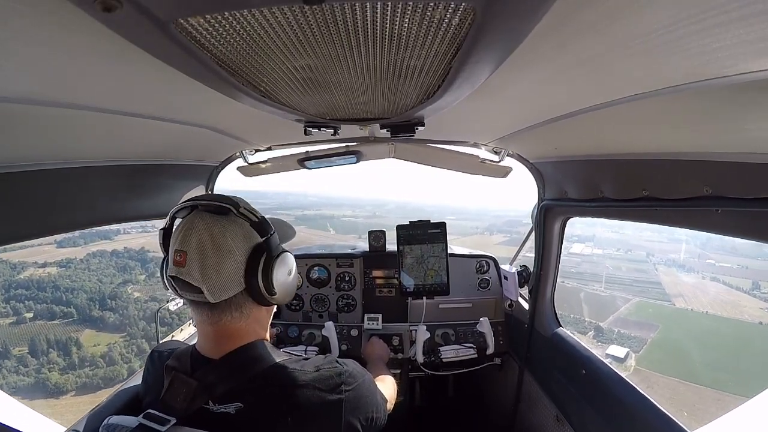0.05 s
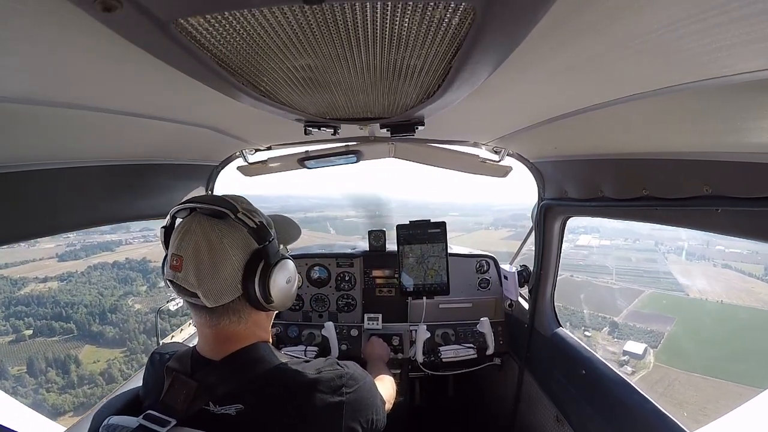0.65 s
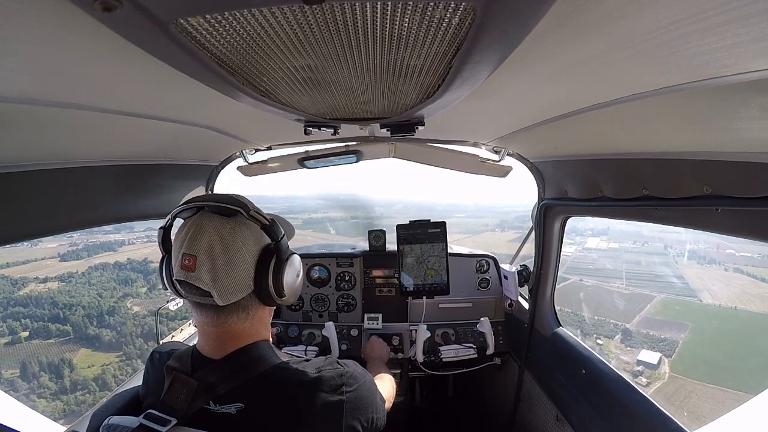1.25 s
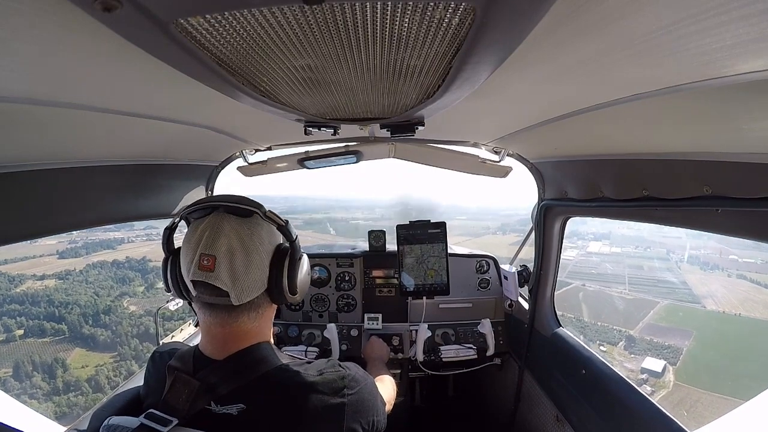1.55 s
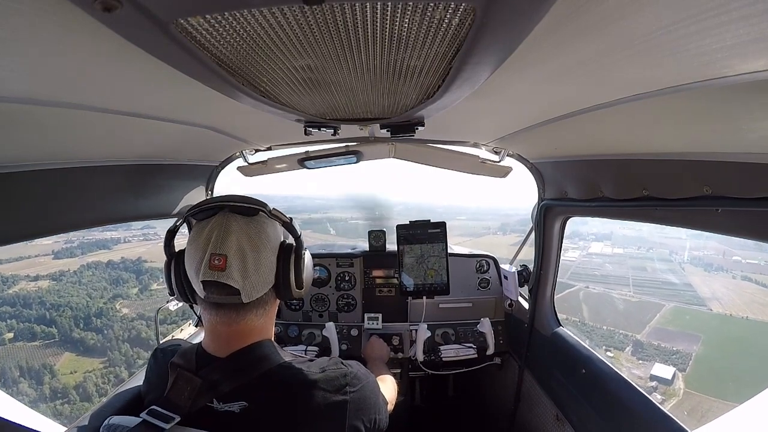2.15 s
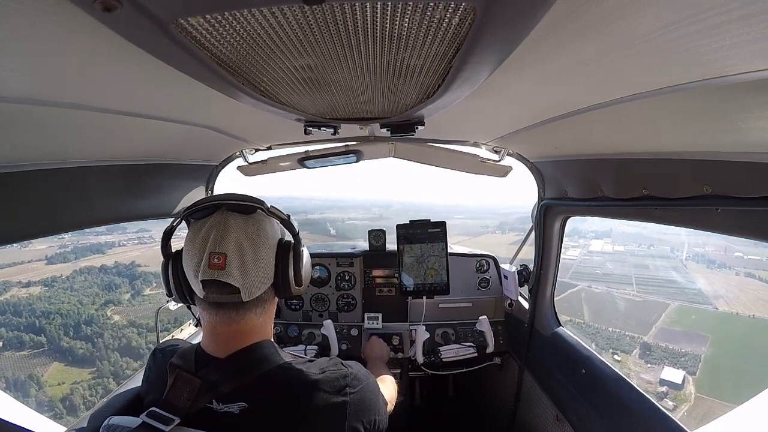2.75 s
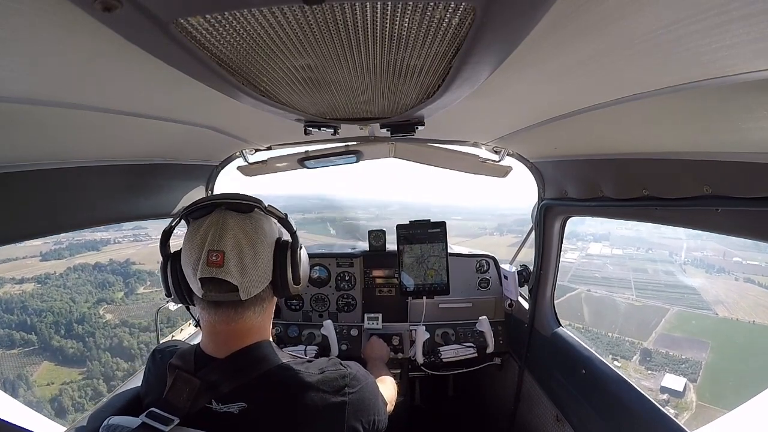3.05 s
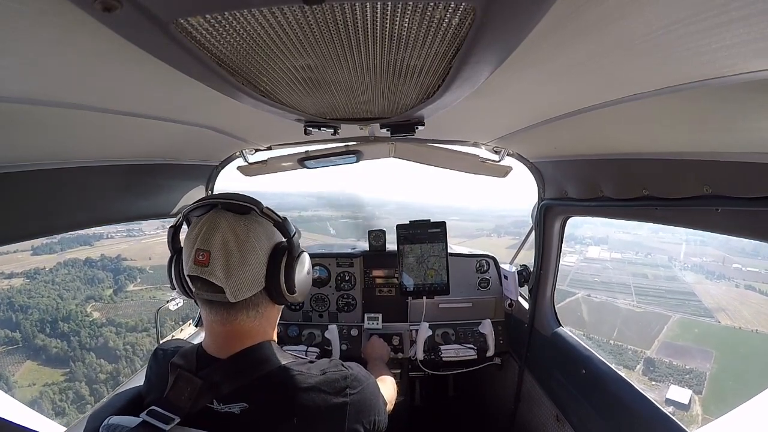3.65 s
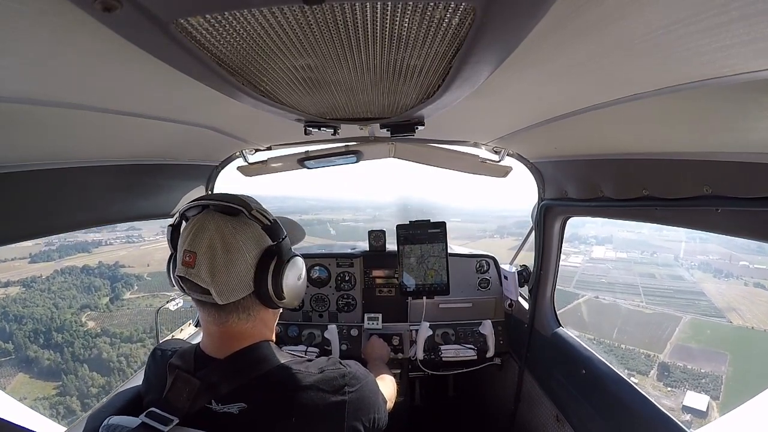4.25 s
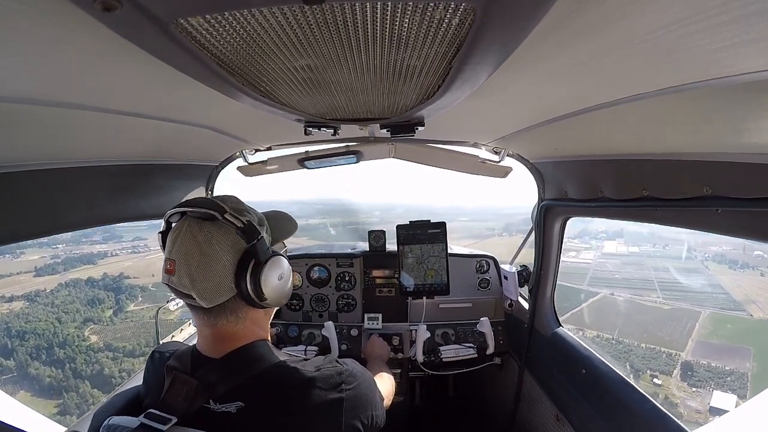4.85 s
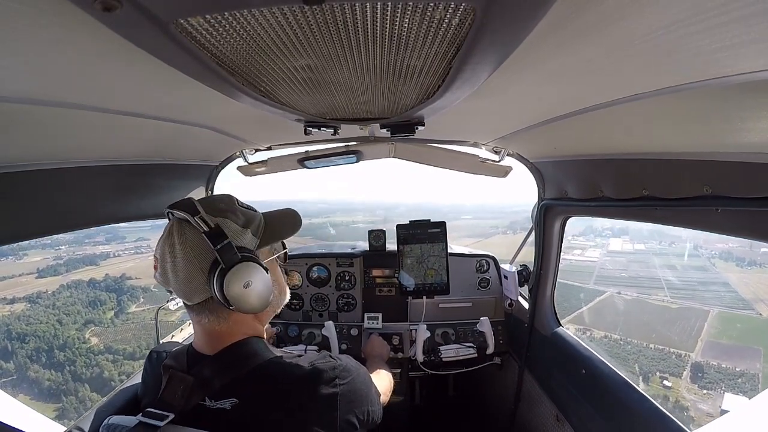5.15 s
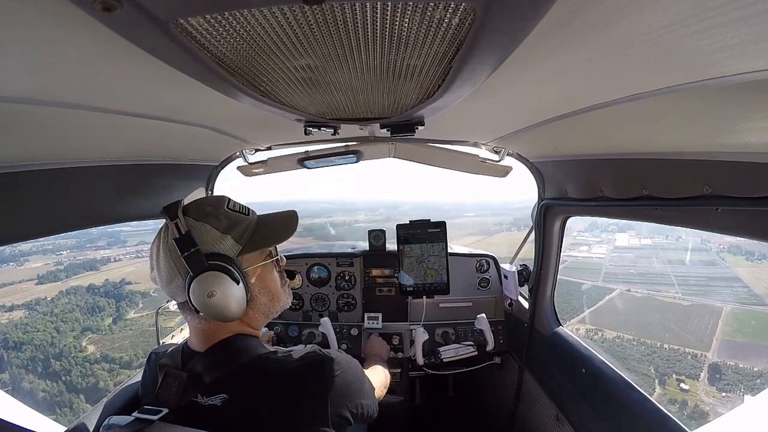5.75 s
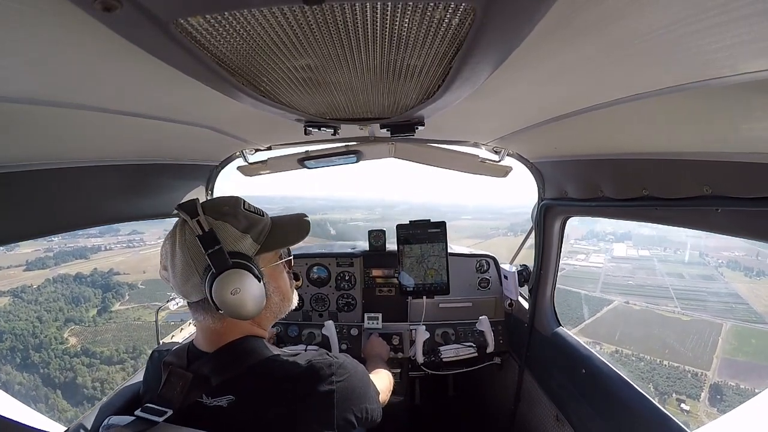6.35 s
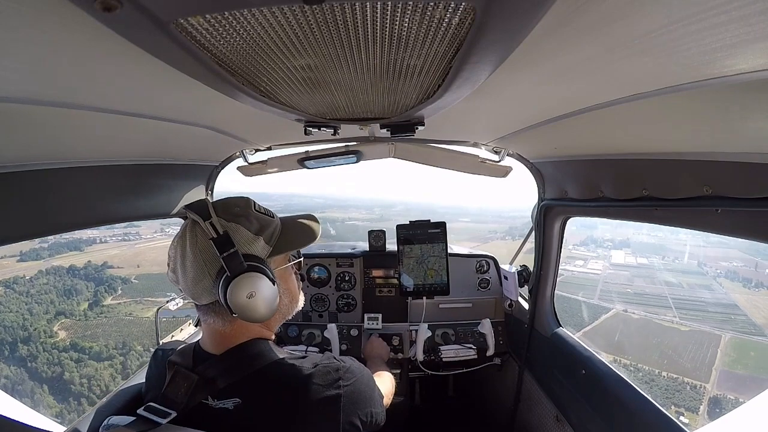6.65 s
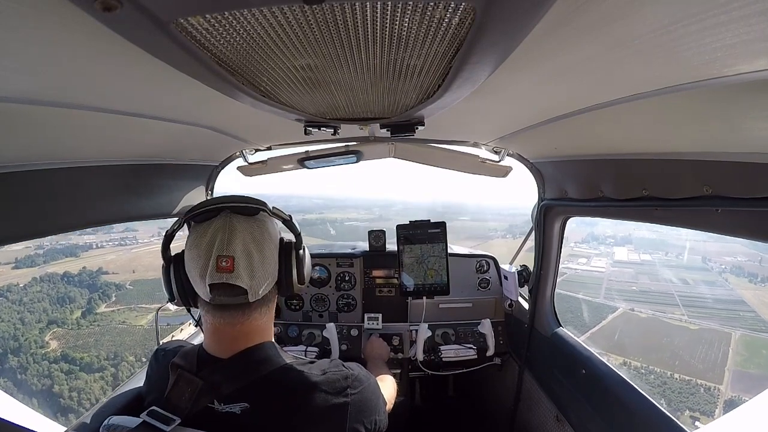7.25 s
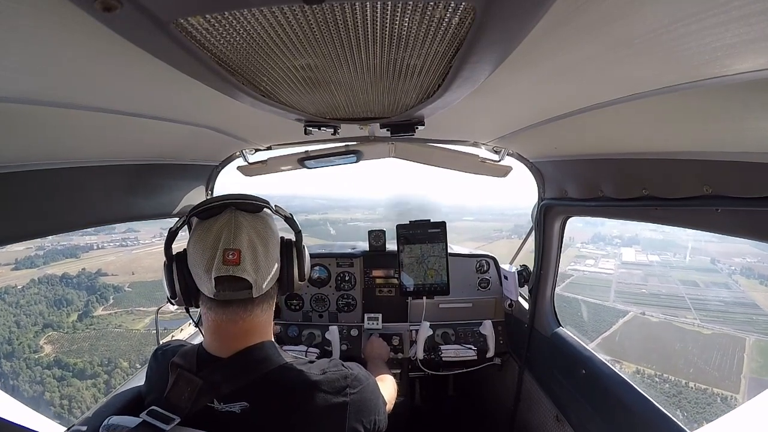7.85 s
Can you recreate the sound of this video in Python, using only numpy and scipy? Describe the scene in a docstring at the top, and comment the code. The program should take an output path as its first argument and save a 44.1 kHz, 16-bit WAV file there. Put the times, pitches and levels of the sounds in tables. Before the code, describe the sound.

Heard from inside a light aircraft's cabin, a low, booming engine and propeller hum runs throughout over hissing air. Rough air soon sets in with a few dull thuds: the hull rumbles, the panels drum, a leak whistles faintly and the engine sounds buzzier. A little past halfway the wind noise falls back, leaving a strong, steady boom at a slightly higher engine speed.

```python
"""A four-cylinder engine and its two-blade propeller, from one microphone inside a light aircraft in flight.
Blade passes and firings boom close around the seat, over a stack of shaft orders and a faint clatter.
Just outside, air buffets the hull, drums on the panels, hisses and whistles through leaks. Rough air
loads the blades and swells the rush from about 1 s to 5 s, then drops away; the propeller speeds up a
little."""
import sys
import numpy as np
from scipy import signal
from scipy.fft import rfft, irfft, next_fast_len
from scipy.io import wavfile
from scipy.ndimage import uniform_filter1d, minimum_filter1d

SR = 44100
rng = np.random.default_rng(int(sys.argv[2]) if len(sys.argv) > 2 else 0)


def int16_out(signal):
    """Quantize to a 16-bit WAV file."""
    q = np.round(np.clip(np.atleast_2d(signal).T, -1, 1) * 32767)
    wavfile.write(sys.argv[1], SR, q.astype(np.int16))


N = 353682

# propeller shaft: (time [s], speed [turns/s])
SHAFT_SPEED = [(0, 36.35), (.3, 36.23), (.75, 36.2), (1.5, 37.25), (2.5, 37.22), (3.25, 36.7), (4.5, 37.02),
               (4.75, 37.24), (5.15, 38.0), (5.5, 38.42), (6, 38.42), (6.4, 38.2), (7.25, 38.1),
               (8.02, 38.2)]
# cabin boom at the microphone: (time [s], deep tone level [dB], octave level [dB])
BOOM_LEVELS = [(0, -12, -23), (.3, -11, -22.5), (.9, -12.5, -29), (1.3, -18, -42), (1.65, -21, -31),
               (2.2, -21.5, -20), (2.7, -20, -18), (3.05, -30, -25.5), (3.4, -16, -33), (3.65, -10.5, -43),
               (4.15, -15, -23.5), (4.76, -24, -20), (5.05, -9.5, -20.5), (5.5, -10.5, -27), (5.9, -8, -29),
               (6.4, -11.5, -24.5), (8.02, -10.5, -24.5)]
# engine and propeller lines; half orders come from unequal cylinders:
# (order [x shaft speed], relative level unloaded [dB], relative level at full load [dB])
SHAFT_ORDERS = [(1, -34, -22), (1.5, -36, -28), (2.5, -33.5, -35), (3, -33, -22.5), (3.5, -38, -27.5),
                (4.5, -40, -28.5), (5, -45, -37), (5.5, -53, -39), (6, -40, -26), (7, -51, -35),
                (7.5, -57, -41), (9, -56, -41), (10, -46, -34), (12, -59, -47), (14, -46.5, -48),
                (15, -51, -45), (16, -56, -52), (16.5, -57, -51), (17, -59, -50), (18, -59, -46),
                (18.5, -52, -52), (20.5, -65, -48), (26.5, -57, -49), (31, -61, -53), (40, -63, -49)]
# engine clatter: (frequency at the opening shaft speed [Hz], half-order level re the air rush [dB])
CLATTER_SPECTRUM = [(400, -31.5), (520, -33), (750, -29.5), (1100, -30), (1500, -34.5), (2000, -38.5)]
# air rush along the hull: (time [s], relative level [dB])
AIR_RUSH = [(0.03, -30), (0.14, -27.5), (0.6, -31.5), (1.11, -31.5), (1.55, -27), (2.1, -25), (3.2, -24),
            (3.9, -25.5), (4.6, -24.5), (5.08, -24), (5.27, -31), (6.08, -36), (6.8, -35.5), (7.55, -33.5),
            (7.93, -35)]
# buffeting of the hull: (frequency [Hz], relative density [dB])
BUFFET_SPECTRUM = [(8, -21), (18, -12.5), (30, -6.5), (55, -3), (85, 0), (115, -4.5), (150, -10.5),
                   (200, -18.5), (400, -41)]
# drumming of the cabin panels: (frequency [Hz], relative density [dB])
PANEL_SPECTRUM = [(60, -29), (120, -13), (165, -10), (220, -2), (275, 0.5), (325, 0), (390, -2.5),
                  (440, -9.5), (500, -32.5), (900, -49)]
# harder drumming on a first gust and as the rush drops: (peak time [s], half length [s], lift [dB])
PANEL_SWELLS = [(0.197, 0.41, 2.7), (5.25, .25, 2)]
# air hiss as heard from inside: (frequency [Hz], relative density [dB])
HISS_SPECTRUM = [(150, 2), (480, -3), (600, -1.5), (850, -3), (1250, -5.5), (1650, -4.5), (2350, -8),
                 (3100, -15.5), (3700, -16.5), (4400, -11.5), (5600, -14), (6700, -27), (8900, -35.5),
                 (10200, -44.5), (11500, -58)]
# hollow ring of the cabin and its leaks: (centre [Hz], width [Hz], lift [dB])
CABIN_RESONANCES = [(558, 29, 3), (737, 26, 1.5), (877, 55, 3.5), (1540, 61, 1.5), (1668, 52, 2),
                    (1806, 82, 5.5), (1854, 90, -4), (2100, 70, 1.5), (3920, 110, 2)]
# swells in the hollow middle of the rush: (peak time [s], half length [s], centre [Hz], lift [dB])
HOWL_SWELLS = [(.12, .22, 860, 3), (1.0, .45, 860, 2), (3.25, .15, 980, 2), (3.8, .13, 820, 3.5),
               (4.4, .3, 690, 3), (5.0, .25, 700, 2.3), (7.6, .2, 860, 2.8)]
# swells of the leak's whistle: (peak time [s], half length [s], lift [dB])
WHISTLE_SWELLS = [(2.7, .4, 5.5), (4.8, .35, 3)]
# single gusts against the hull: (peak time [s], half length [s], level [dB])
GUST_THUDS = [(.1, .13, -18), (0.997, .06, -12.5), (1.14, 0.045, -20), (1.329, 0.058, -22)]
# their dull body: (frequency [Hz], relative density [dB])
THUD_SPECTRUM = [(8, -13), (17, -6), (28, 1), (42, -9)]
# thrum of the roof overhead: (frequency [Hz], relative density [dB])
THRUM_SPECTRUM = [(100, -22.5), (150, -0.5), (178, -0.5), (235, -4), (275, -14), (340, -28)]

TIME_S = np.arange(N) / SR


def undb(db):
    """Decibels to gain."""
    return 10 ** (np.asarray(db) / 20)


def curves(table):
    """Each column of a table, joined by straight lines in time."""
    times, *columns = np.transpose(table)
    return [np.interp(TIME_S, times, column) for column in columns]


def ramp(start_s, length_s):
    """A straight rise from 0 to 1, then held."""
    return np.clip((TIME_S - start_s) / length_s, 0, 1)


def swell(peak_s, half_s):
    """A bell-shaped rise and fall, 0-1."""
    return np.exp(-((TIME_S - peak_s) / half_s) ** 2)


def walk(rate_hz):
    """Random levels held 1 / rate_hz seconds and smoothed twice; spread near 1."""
    hold = int(SR / rate_hz)
    held = np.repeat(rng.standard_normal(N // hold + 1), hold)
    return np.sqrt(2) * uniform_filter1d(uniform_filter1d(held, hold), hold)[:N]


def noise(spectrum, resonances=()):
    """Noise of rms 1 with a smooth spectrum and any resonances on top."""
    size = next_fast_len(N, True)
    bin_hz = np.maximum(np.fft.rfftfreq(size, 1 / SR), 1)
    hz, db = np.transpose(spectrum)
    shape_db = np.interp(np.log(bin_hz), np.log(hz), db)
    shape_db -= 60 * np.log10(np.maximum(bin_hz / hz[-1], 1))  # 60 dB a decade above the last row
    for centre, width, lift in resonances:
        shape_db += lift / (1 + (2 * (bin_hz - centre) / width) ** 2)
    shaped = irfft(rfft(rng.standard_normal(size)) * undb(shape_db), size)[:N]
    return shaped / shaped.std()


def partial(turns, order, db):
    """One sine locked to the shaft, at an rms level."""
    return np.sqrt(2) * undb(db) * np.sin(2 * np.pi * order * turns)


def blade_load(start_s, build_s, before=.22, after=.025):
    """Load on the blades, 0-1: light at first, full in the rough air, almost none after it."""
    rising = before + (1 - before) * ramp(start_s, build_s)
    release = ramp(start_s=5.04, length_s=.34)
    return rising * (1 - release) + after * release


def cabin_boom(turns, flutter_db=.4):
    """Two blades and two firings a turn press on the cabin: a firm deep tone and its octave."""
    deep_db, octave_db = curves(BOOM_LEVELS)
    # the octave slips in the rough air: it first sharpens the deep tone's crests, later its troughs
    eased = np.sin(np.pi / 2 * ramp(start_s=1.2, length_s=4.3)) ** 2
    slip_turns = (2 * eased - 1) / 16
    deep = partial(turns, 2, deep_db + flutter_db * walk(14))
    octave = partial(turns + slip_turns, 4, octave_db + flutter_db * walk(10))
    return deep + octave


def propeller_drone(turns, start_s=.8, build_s=.85, calm_db=-40.5, loaded_db=-26, sag_db_per_s=.06):
    """The fourth harmonic of the blade passes rises above the rumble under load, then slowly sags."""
    order, waver_db, wander_cycles = 8, .8, .025
    held_s = np.maximum(TIME_S - start_s - build_s, 0)
    db = calm_db + blade_load(start_s, build_s) * (loaded_db - calm_db - sag_db_per_s * held_s)
    phase = wander_cycles * walk(6)
    return partial(turns + phase / order, order, db + waver_db * walk(6))


def engine_orders(turns, load, gain_db=.3, waver_db=1., wander_cycles=.03):
    """Most of the other orders grow with the load; turbulence makes each waver in level and phase."""
    unsteady = 1 - load / 2  # driven hard, the lines hold firmer
    stack = 0
    for order, calm_db, loaded_db in SHAFT_ORDERS:
        phase = rng.random() + wander_cycles * unsteady * walk(8)
        db = calm_db + load * (loaded_db - calm_db) + waver_db * unsteady * walk(6)
        stack += partial(turns + phase / order, order, db)
    return undb(gain_db) * stack


def engine_clatter(turns, air_db):
    """Valves and pistons repeat one noisy pattern every two turns: a dense comb of weak half orders."""
    hz, db = np.transpose(CLATTER_SPECTRUM)
    cycle_turns = np.linspace(0, 2, 2049)
    orders = np.arange(11.5, 55, .5)
    levels_db = np.interp(np.log(orders * SHAFT_SPEED[0][1]), np.log(hz), db)
    pattern = sum(partial(cycle_turns + 2 * rng.random(), order, level_db)
                  for order, level_db in zip(orders, levels_db))
    return np.interp(turns % 2, cycle_turns, pattern) * undb(air_db)


def hull_buffet(load, calm_db=-25.7, loaded_db=-13, gustiness_db=.5):
    """Gusts shake the hull all around the microphone, harder in rough air."""
    db = calm_db + np.cbrt(load) * (loaded_db - calm_db) + gustiness_db * walk(3.7)
    return noise(BUFFET_SPECTRUM) * undb(db)


def panel_drumming(air_db, load, offset_db=-.77, load_trim_db=-.1):
    """Passing air and propeller wash drum on the panels, an arm's length away."""
    lift_db = sum(db * swell(peak_s, half_s) for peak_s, half_s, db in PANEL_SWELLS)
    return noise(PANEL_SPECTRUM) * undb(air_db + offset_db + load_trim_db * load + lift_db)


def air_hiss(air_db, offset_db=1.1, howl_width_hz=240, waver_db=.5):
    """Air hisses along the hull and through leaks; each swell lifts a hollow band in its middle."""
    hiss = noise(HISS_SPECTRUM, CABIN_RESONANCES)
    howls = 0
    for peak_s, half_s, hz, db in HOWL_SWELLS:
        band = signal.lfilter(*signal.iirpeak(hz, hz / howl_width_hz, fs=SR), hiss)
        lift_db = (db + waver_db * walk(4)) * swell(peak_s, half_s)
        howls += band * (undb(lift_db) - 1)
    return (hiss + howls) * undb(air_db + offset_db)


def leak_whistle(air_db, centre_hz=1671, width_hz=22, offset_db=-18.8):
    """Air through a leak sings in a narrow, breathy band that swells twice in the rough air."""
    resonator = signal.iirpeak(centre_hz, centre_hz / width_hz, fs=SR)
    band = signal.lfilter(*resonator, noise(HISS_SPECTRUM))
    lift_db = sum(db * swell(peak_s, half_s) for peak_s, half_s, db in WHISTLE_SWELLS)
    return band / band.std() * undb(air_db + offset_db + lift_db)


def gust_thuds():
    """Single gusts bump the hull softly, once at the start and again as the air turns rough."""
    envelope = sum(undb(db) * swell(peak_s, half_s) for peak_s, half_s, db in GUST_THUDS)
    return noise(THUD_SPECTRUM) * envelope


def roof_thrum(load, loaded_db=-26, lift_db=7.5):
    """Gusts set the roof thrumming over the microphone, hardest as the rough air sets in."""
    db = loaded_db + lift_db * swell(peak_s=2.05, half_s=.4)
    return noise(THRUM_SPECTRUM) * load ** 3 * undb(db)


def scene():
    """Engine, propeller and air meet at one spot in the cabin, in mono."""
    shaft_hz, = curves(SHAFT_SPEED)
    air_db, = curves(AIR_RUSH)
    load = blade_load(start_s=1.03, build_s=.84)
    turns = np.cumsum(shaft_hz) / SR
    tones = cabin_boom(turns) + propeller_drone(turns) + engine_orders(turns, load)
    clatter = engine_clatter(turns, air_db)
    hull = hull_buffet(load) + panel_drumming(air_db, load) + roof_thrum(load) + gust_thuds()
    rush = air_hiss(air_db) + leak_whistle(air_db)
    return (tones + clatter + hull + rush)[None]


def record(dry, ceiling=.67, hold_s=.015, split_hz=400, top_hz=15600):
    """After the microphone, a look-ahead limiter holds down the bass peaks and the top is cut."""
    bass = signal.sosfiltfilt(signal.butter(2, split_hz, fs=SR, output="sos"), dry)
    hold = int(hold_s * SR)
    allowed_gain = np.minimum(1, ceiling / (np.abs(bass) + 1e-9))
    gain = uniform_filter1d(minimum_filter1d(allowed_gain, hold), hold)
    limited = dry - bass + gain * bass
    return signal.sosfilt(signal.ellip(8, .2, 70, top_hz, fs=SR, output="sos"), limited)


dry = scene()
out = record(dry)
int16_out(out)
```